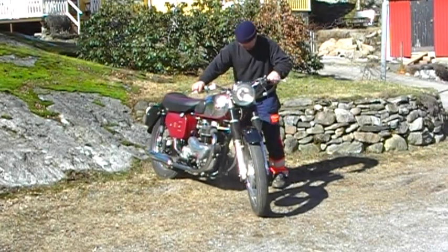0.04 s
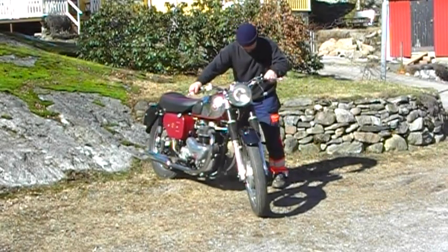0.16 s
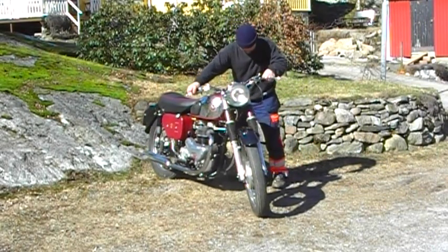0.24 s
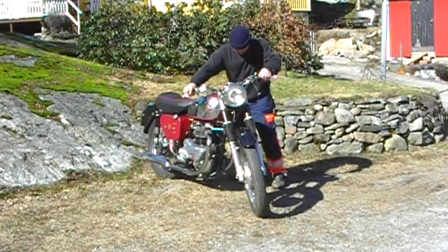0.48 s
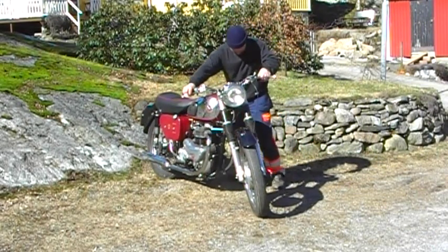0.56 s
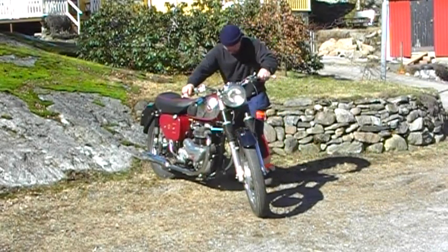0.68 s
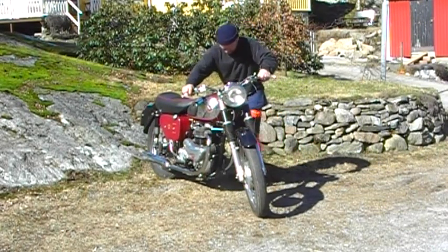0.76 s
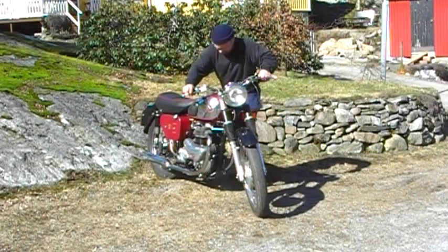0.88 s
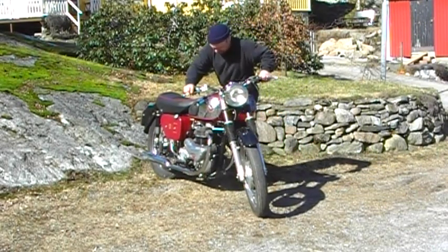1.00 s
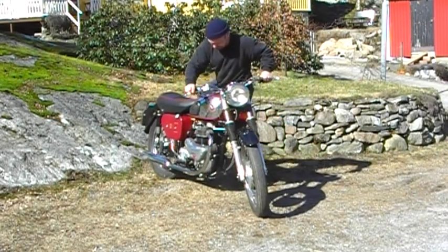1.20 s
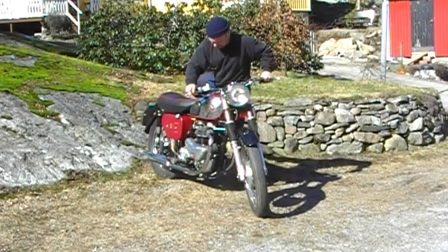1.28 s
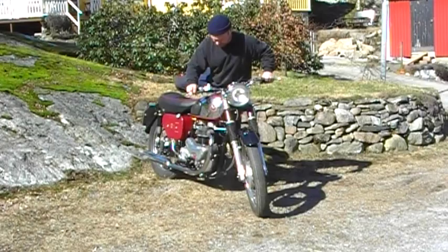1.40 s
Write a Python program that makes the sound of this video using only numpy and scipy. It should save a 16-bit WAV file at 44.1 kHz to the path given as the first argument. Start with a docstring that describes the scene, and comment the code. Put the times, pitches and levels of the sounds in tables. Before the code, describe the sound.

Three metal knocks on a parked motorcycle, each weaker, with faint ticks outdoors.

```python
"""In a quiet yard a parked motorcycle is handled: after a light scrape, metal parts knock three times,
each time weaker. Every impact excites the modes of frame and casings, reflects from a house front and
dies away as diffuse reverberation. Linkage and grit tick faintly over distant outdoor noise.
A gust buffets the microphone at first, and the first knock overloads it."""
import sys
import numpy as np
from scipy import signal
from scipy.fft import rfft, irfft, next_fast_len
from scipy.io import wavfile
from scipy.ndimage import uniform_filter1d

SR = 44100
rng = np.random.default_rng(int(sys.argv[2]) if len(sys.argv) > 2 else 0)


def unload_wav(signal):
    """Save mono or channel-first audio to the path in sys.argv[1] as 16-bit WAV at rate SR, clipped to [-1, 1]."""
    wavfile.write(
        sys.argv[1],
        SR,
        np.round(np.clip(np.atleast_2d(signal).T, -1, 1) * 32767).astype(np.int16),
    )


N = 63945


def undb(db):
    """Amplitude ratio of a level in decibels."""
    return 10 ** (np.asarray(db) / 20)


def unit(x):
    """Normalisation to rms 1."""
    return x / np.sqrt(np.mean(x ** 2))


def at(points, hz):
    """Interpolation of a table on a log-frequency axis."""
    f, values = np.array(points, float).T
    return np.interp(np.log(np.maximum(hz, 1)), np.log(f), values)


def bell(f, hz, octaves):
    """Gaussian band in log frequency, 1 at its centre."""
    return np.exp(-.5 * (np.log2((f + 1) / hz) / octaves) ** 2)


def shape(x, gain):
    """Linear filtering: the spectrum is multiplied by gain(frequency)."""
    size = next_fast_len(N + 4096)
    f = np.arange(size // 2 + 1) * SR / size
    return irfft(rfft(x, size) * gain(f), size)[:N]


def colour(x, points):
    """Zero-phase filtering by a table of (frequency [Hz], gain [dB])."""
    return shape(x, lambda f: undb(at(points, f)))


def noise(points):
    """Gaussian noise of rms 1 with the given relative spectral density."""
    return unit(colour(rng.standard_normal(N), points))


def curve(points):
    """Amplitude envelope from a table of (time [s], level [dB])."""
    return undb(np.interp(np.arange(N) / SR, *np.array(points, float).T))


def strike(start, rise, t60):
    """Transient envelope: exponential build-up, and damping of 60 dB in t60 seconds."""
    age = np.maximum(np.arange(N) / SR - start, 0)
    return (1 - np.exp(-age / max(rise, 1e-5))) * np.exp(-np.log(1000) * age / t60)


def fade(x, start, rise, t60s):
    """Frequency-dependent damping: each band builds up in rise(frequency) and has its own decay."""
    centres, out = np.geomspace(200, 14000, num=9), 0
    for hz, share in zip(centres, np.eye(len(centres))):
        band = shape(x, lambda f: at(list(zip(centres, share)), f))
        out = out + band * strike(start, rise(hz), at(t60s, hz))
    return out


def stereo(mid, side):
    """Sum and difference of mid and side give left and right."""
    return np.array([mid + side, mid - side])


def outdoor_air():
    """Ambient noise: distant sound arrives only weakly correlated between left and right."""
    # (frequency [Hz], relative density [dB])
    spectrum = [(20, -24), (45, -11), (80, -4.5), (180, -6), (450, -8.5), (800, -10), (2000, -17),
                (5300, -26), (9000, -32), (12000, -37.5), (15000, -46)]
    return undb(-56.5) * stereo(noise(spectrum), .8 * noise(spectrum))


def wind():
    """Turbulent pressure: buffets drive the two microphone ports in antiphase, a small part in phase."""
    # course of the gust (time [s], level [dB])
    envelope = [(0, -33.5), (.07, -28.5), (.095, -27), (.135, -18.5), (.16, -44), (.185, -29),
                (.215, -44.5), (.4, -53), (.5, -48), (.58, -48.5), (.63, -66), (.92, -71.5), (1, -56),
                (1.07, -67.5), (1.45, -88)]
    # antiphase part (frequency [Hz], relative density [dB])
    buffet_spectrum = [(20, -22), (60, 3), (130, 0), (190, -10.5), (270, -20.5), (400, -47), (1000, -64)]
    # in-phase part (frequency [Hz], relative density [dB])
    shared_spectrum = [(20, -26), (55, -9.5), (110, 3.5), (170, -10), (260, -17), (400, -40.5), (1000, -59)]
    buffets = noise(buffet_spectrum) * np.array([[1], [-.73]])
    return curve(envelope) * (buffets + .2 * noise(shared_spectrum))


def scrape(grain_db=3):
    """Sliding friction: boot and clothes rub unevenly, giving noise with a gritty modulation."""
    # course of the rubbing (time [s], level [dB])
    envelope = [(0, -56), (.055, -67), (.09, -55.5), (.16, -58.5), (.172, -49), (.2, -48), (.23, -70.5),
                (.82, -76), (.875, -59.5), (.94, -76), (1.0, -60.5), (1.04, -87.5), (1.2, -74), (1.3, -66),
                (1.45, -67.5)]
    # friction noise (frequency [Hz], relative density [dB])
    spectrum = [(300, -6), (1200, 3.5), (3500, -1), (5200, 1.5), (8500, -2), (11000, -10.5), (15000, -5)]
    grain = unit(uniform_filter1d(rng.standard_normal(N), size=130))
    return noise(spectrum) * curve(envelope) * unit(undb(grain_db * grain))


def ticks():
    """Small impacts: linkage and grit give off quickly damped bursts of band noise."""
    # (time [s], level [dB], centre frequency [Hz])
    impacts = [(0.0648, -50.5, 2820), (0.101, -49, 5560), (0.119, -45, 7300), (0.169, -45, 5000),
               (.181, -45, 2700), (0.842, -65, 5480), (0.865, -55.5, 4000), (1.003, -56.5, 5450),
               (1.406, -63.5, 2800)]
    out = 0
    for start, db, hz in impacts:
        band = shape(rng.standard_normal(N), lambda f: bell(f, hz, octaves=.7))
        out = out + undb(db) * unit(band) * strike(start, rise=.0004, t60=.025)
    return out


def crack(start, rise):
    """Contact noise: a brief force between metal parts has a broad spectrum."""
    # (frequency [Hz], relative density [dB])
    spectrum = [(300, -25.5), (1200, -3.5), (1900, -5), (2500, 4), (3200, -4), (4000, -4.5), (4700, 4.5),
                (5600, -4.5), (7000, -6.5), (10500, -9), (15000, -19)]
    return noise(spectrum) * strike(start, rise, t60=.019)


def build_up(hz):
    """Dispersion: low bending waves travel slower, so the rise time [s] grows towards the bass."""
    return .0072 * (1000 / hz)


def clack(start, rise, tone, decay_scale):
    """Modal overlap: the machine's dense, damped modes merge into noise whose bass lasts longest."""
    # (frequency [Hz], relative density [dB])
    spectrum = [(140, -37.5), (260, 4), (520, -5), (700, 0), (1000, 3), (1300, 12), (2000, -5.5),
                (2480, 6.5), (2850, -13), (3450, 9.5), (4150, -23.5), (4650, -2.5), (6400, -6),
                (7900, -15.5), (8800, -15), (9900, -15), (11000, -15.5), (15000, -29.5)]
    # damping (frequency [Hz], T60 [s])
    decay = [(250, 0.18), (1200, 0.098), (3000, 0.097), (5000, 0.031), (9000, 0.098), (14000, 0.069)]
    t60s = [(hz, decay_scale * t60) for hz, t60 in decay]
    return fade(shape(noise(spectrum), tone), start, lambda hz: rise + build_up(hz), t60s)


def ring(start, rise, tone):
    """Free vibration: the distinct modes of frame, tank and casings ring as damped sinusoids."""
    # (frequency [Hz], relative level [dB], T60 [s])
    modes = [(240, -15, .13), (292, -27.5, .5), (520.7, -27.5, .4), (952, -21.5, 0.18), (1236.4, -6, 0.14),
             (1271.4, -15.5, 0.26), (1392.4, -14.5, 0.16), (1522, -17.5, 0.33), (1542, -9.5, 0.15),
             (1943, -18, 0.16), (2181, -25, 0.53), (2425, -19, 0.17), (2560, -18, .13), (3118, -25.5, 0.51),
             (3444, -19, 0.24), (3570, -20.5, .3), (3667, -20.5, 0.17), (3846, -21.5, .18),
             (4487, -23, 0.12), (4598.4, -8, 0.065), (4603, -15.5, 0.12), (5730, -14.5, 0.071),
             (5640, -14, 0.098), (6710, -13.5, 0.061), (8660, -16, .085), (9233, -19.5, 0.096)]
    t = np.arange(N) / SR
    phases = rng.uniform(0, 2 * np.pi, len(modes))
    out = 0
    for (hz, db, t60), phase in zip(modes, phases):
        envelope = strike(start, rise + build_up(hz), t60)
        out = out + undb(db) * tone(hz) * np.sin(2 * np.pi * hz * t + phase) * envelope
    return out


def ports(x):
    """Spaced receivers: the two microphone ports hear the machine slightly apart in level and phase."""
    # left minus right (frequency [Hz], level difference [dB])
    level_gap = [(200, -0.6), (1200, 2), (2400, -3.6), (4300, -2), (8500, 0), (14000, -2.5)]
    # left ahead of right (frequency [Hz], phase lead [rad])
    phase_lead = [(200, 0), (1200, -0.11), (2500, 0.27), (4500, -0.24), (8500, 0.82), (14000, .5)]
    half_log_ratio = lambda f: at(level_gap, f) * np.log(10) / 40 + .5j * at(phase_lead, f)
    left = shape(x, lambda f: np.exp(half_log_ratio(f)))
    right = shape(x, lambda f: np.exp(-half_log_ratio(f)))
    return np.array([left, right])


def yard_tail(start, rise=.06):
    """Reverberation: rock, wall and bushes scatter a knock into a decaying diffuse field."""
    # (frequency [Hz], relative density [dB])
    spectrum = [(140, -15.5), (280, 5), (500, 2), (680, -3), (1300, 2.5), (2300, -8), (2850, -9.5),
                (3400, -1.5), (4100, -11.5), (5600, -7.5), (7500, -23.5), (9000, -18), (14000, -35.5)]
    # reverberation time (frequency [Hz], T60 [s])
    decay = [(250, 0.48), (700, 0.88), (1400, .55), (3400, 0.75), (6000, .55), (14000, .4)]
    mid, side = (fade(noise(spectrum), start, lambda hz: rise, decay) for _ in range(2))
    return stereo(mid, .26 * side)


def house_echo(x, delay_s=.0795):
    """Rough-surface reflection: the uneven house front returns one echo, smeared in time."""
    # (frequency [Hz], gain [dB])
    reflection = [(200, -3), (1200, 1.5), (3000, 1.5), (5000, 2), (9000, 1.5), (14000, -9)]
    scatter = rng.standard_normal(N) * strike(delay_s, rise=.003, t60=.045)
    return colour(signal.fftconvolve(x, scatter / np.linalg.norm(scatter))[:N], reflection)


def knock(start, db, rise, bass_db, treble_db, ring_db, echo_db, crack_db, spot_hz, spot_db, decay_scale):
    """Impact excitation: crack, clack and ring arrive directly, followed by echo and reverberation."""
    def tone(f, bass_hz=600, treble_hz=4140):
        """Modal weighting: two shelves and the resonance favoured by the spot struck."""
        bass = bass_db / (1 + (f / bass_hz) ** 2)
        treble = treble_db / (1 + (treble_hz / (f + 1)) ** 4)
        return undb(bass + treble + spot_db * bell(f, spot_hz, octaves=.2))

    direct = undb(crack_db) * crack(start, rise)
    direct += clack(start, rise, tone, decay_scale)
    direct += undb(ring_db) * ring(start, rise, tone)
    echo = stereo(house_echo(direct), .64 * house_echo(direct))
    tail = undb(ring_db - 18) * yard_tail(start)
    return undb(db) * (ports(direct) + undb(echo_db) * echo + tail)


def scene():
    """Superposition: the pressures of open air, wind, handling sounds and knocks add."""
    # metal impacts (time [s], level [dB], rise [s], bass [dB], treble [dB], ring and tail [dB],
    # echo [dB], crack [dB], favoured resonance [Hz], its lift [dB], clack decay scale [ratio])
    knocks = [(0.2018, -6, .0003, 4.5, 1.5, -2.5, -24.5, 6, 4800, 0, .85),
              (0.3777, -11.5, .0006, -0.5, 2, 1, -20, -2, 462, 10, 1.19),
              (0.6134, -21.5, 0.0012, 7.5, -4.5, -1, -23.5, -4, 5600, 3.5, 1.285)]
    return outdoor_air() + wind() + scrape() + sum(knock(*row) for row in knocks) + ticks()


def record(dry, knee=4, cutoff_hz=15200):
    """Saturation and band limiting: the recorder flattens the loudest peaks and cuts the top treble."""
    clipped = dry / (1 + np.abs(dry) ** (2 * knee)) ** (.5 / knee)
    lowpass = signal.ellip(8, .2, 70, cutoff_hz, fs=SR, output="sos")
    return signal.sosfilt(lowpass, clipped)


dry = scene()
out = record(dry)
unload_wav(out)
```